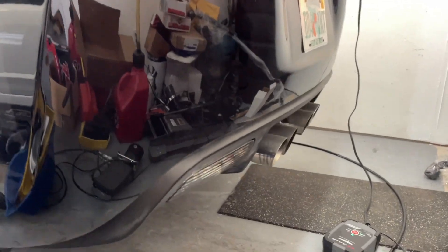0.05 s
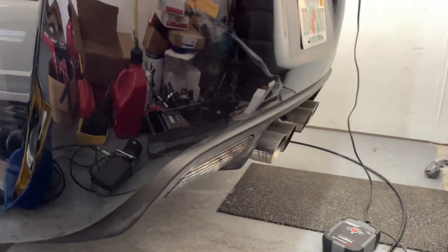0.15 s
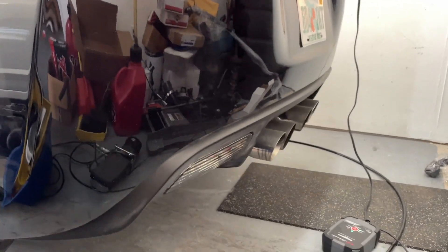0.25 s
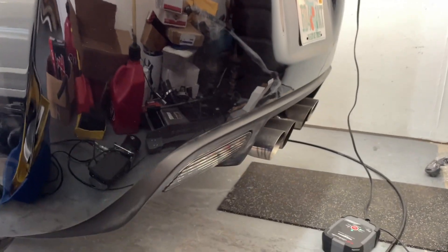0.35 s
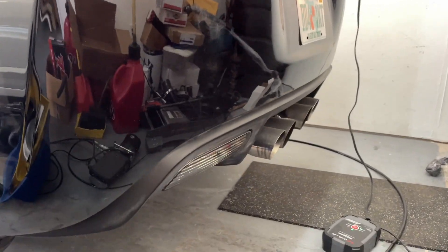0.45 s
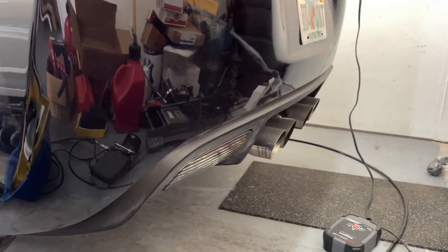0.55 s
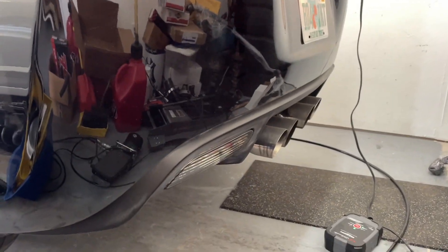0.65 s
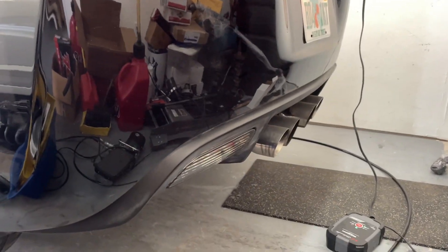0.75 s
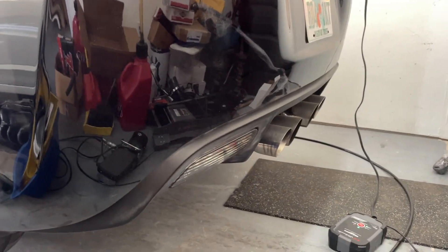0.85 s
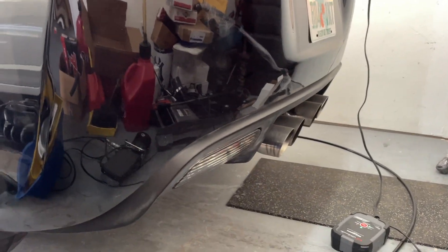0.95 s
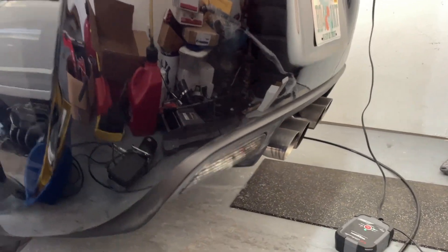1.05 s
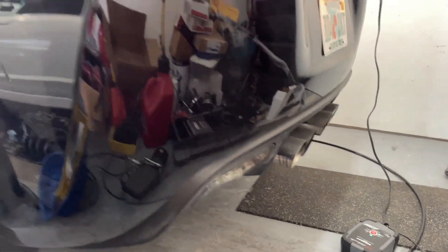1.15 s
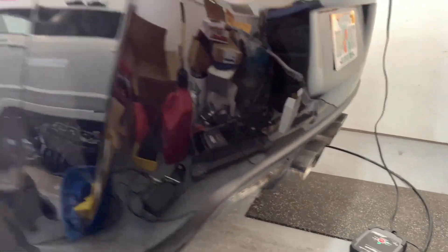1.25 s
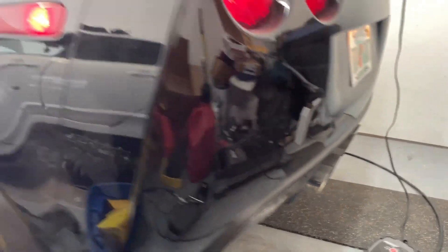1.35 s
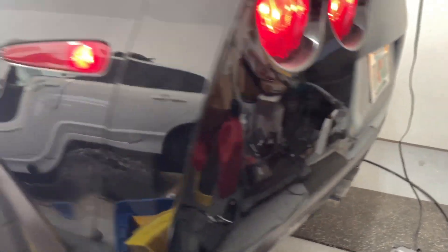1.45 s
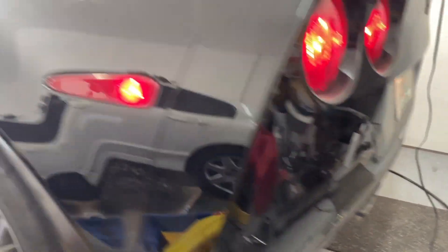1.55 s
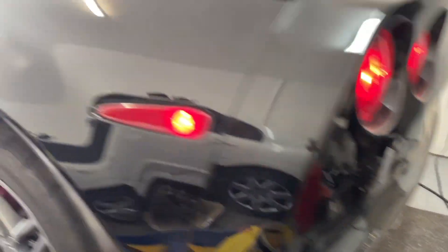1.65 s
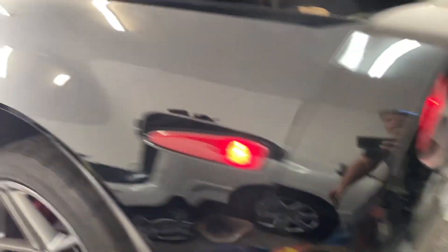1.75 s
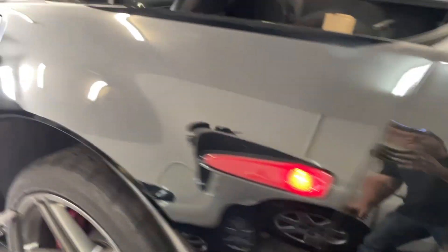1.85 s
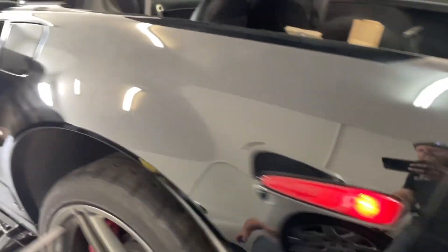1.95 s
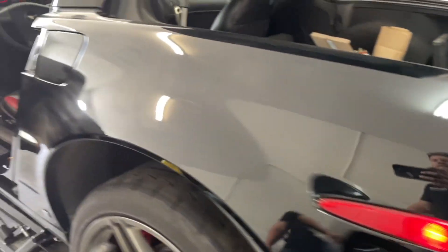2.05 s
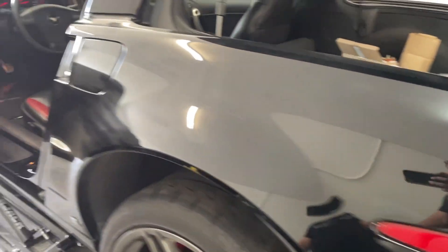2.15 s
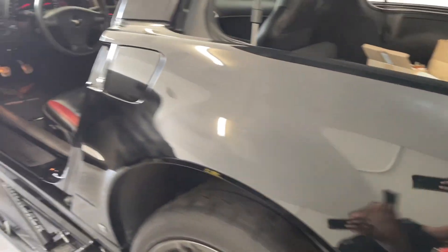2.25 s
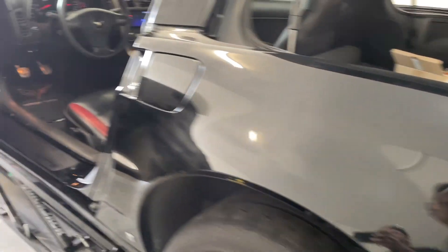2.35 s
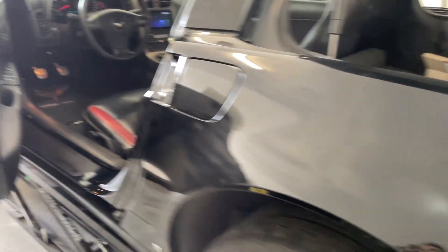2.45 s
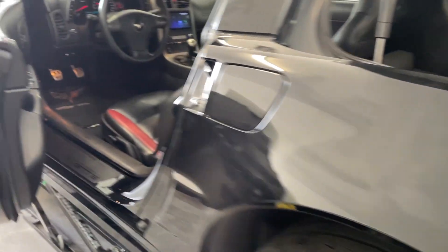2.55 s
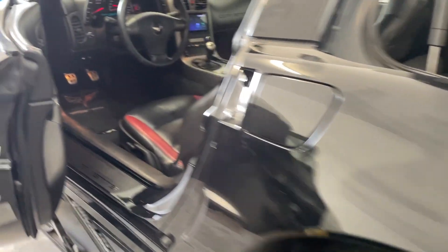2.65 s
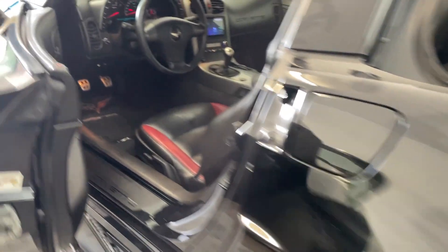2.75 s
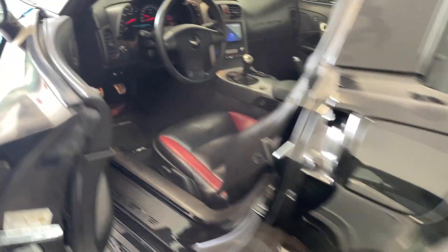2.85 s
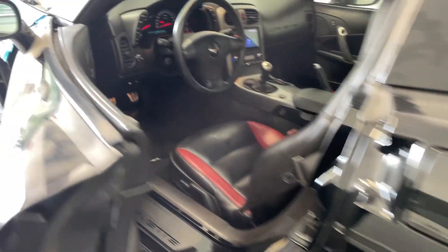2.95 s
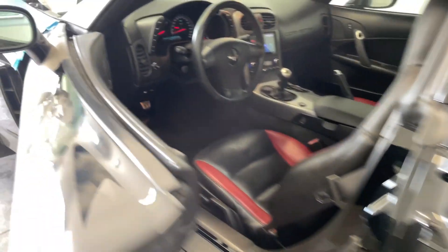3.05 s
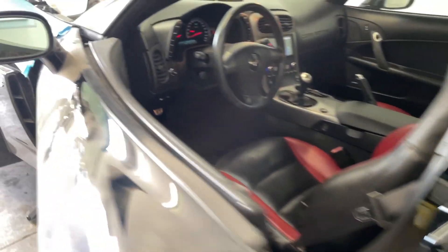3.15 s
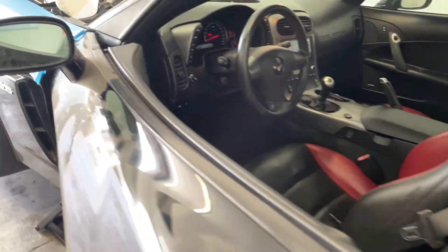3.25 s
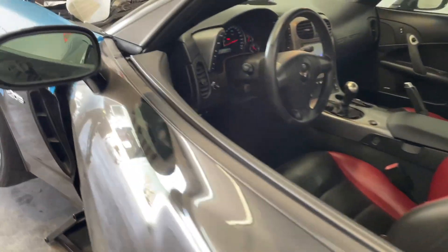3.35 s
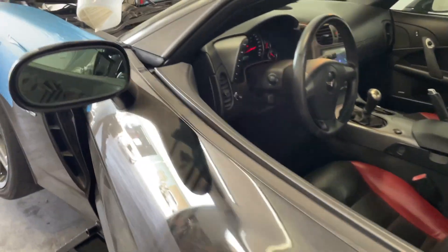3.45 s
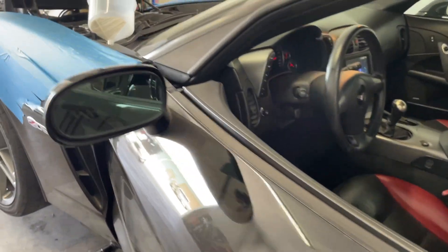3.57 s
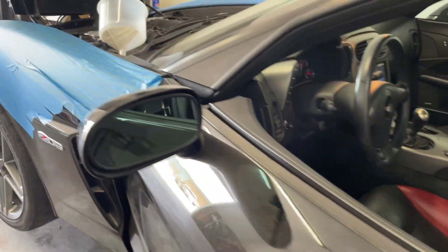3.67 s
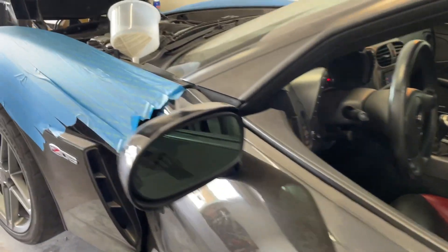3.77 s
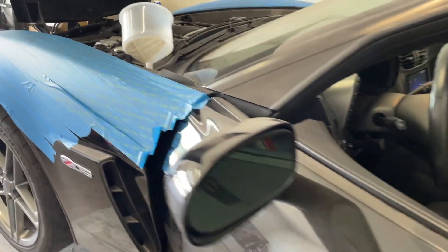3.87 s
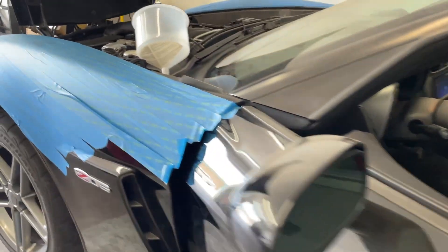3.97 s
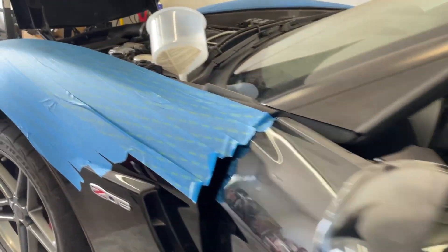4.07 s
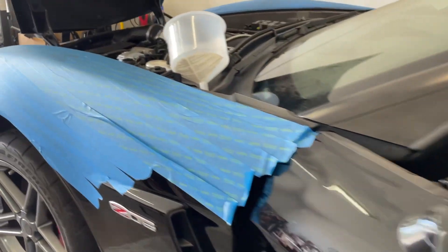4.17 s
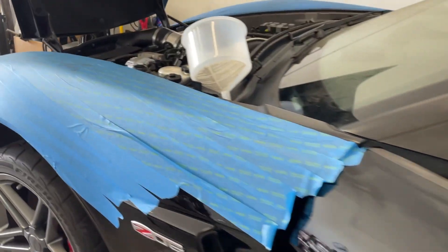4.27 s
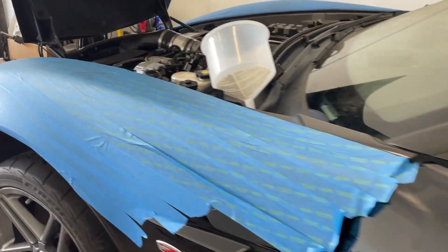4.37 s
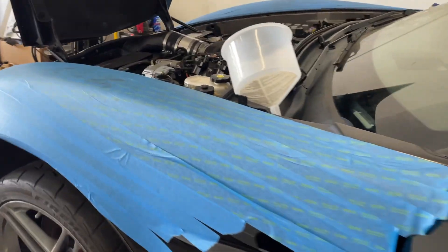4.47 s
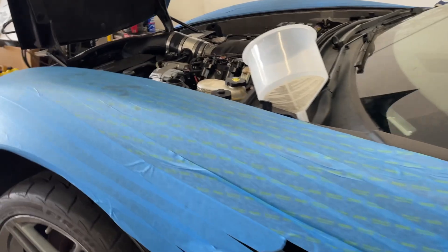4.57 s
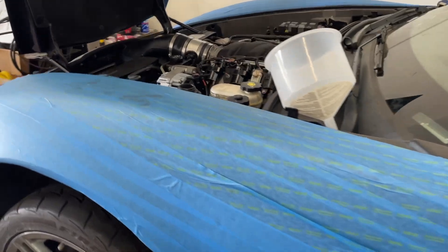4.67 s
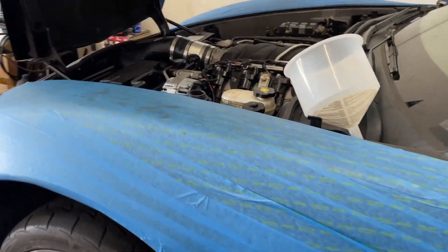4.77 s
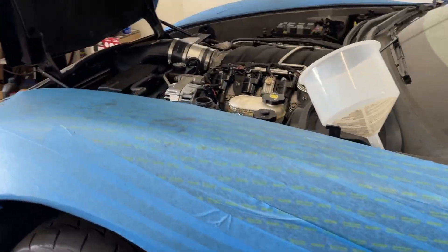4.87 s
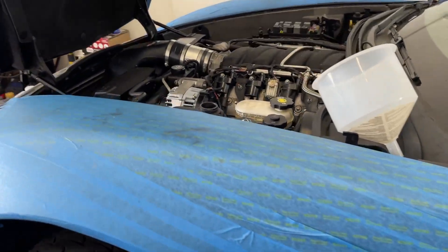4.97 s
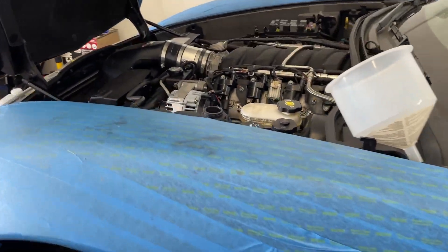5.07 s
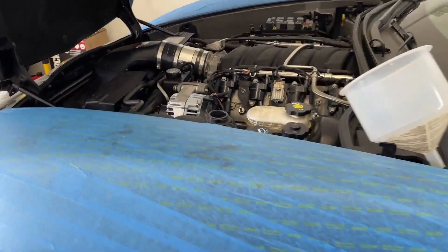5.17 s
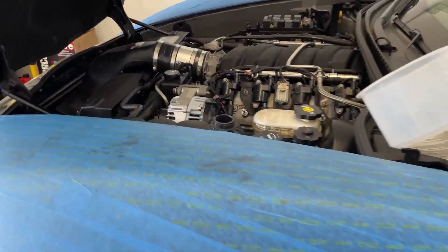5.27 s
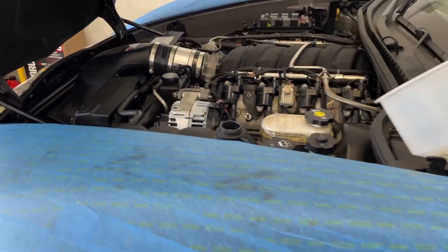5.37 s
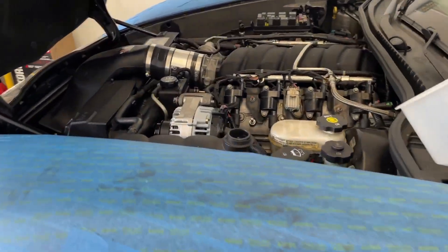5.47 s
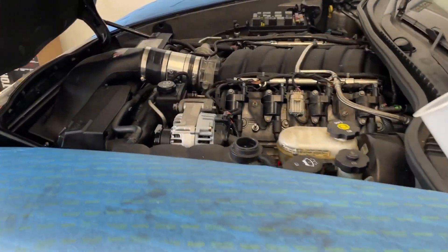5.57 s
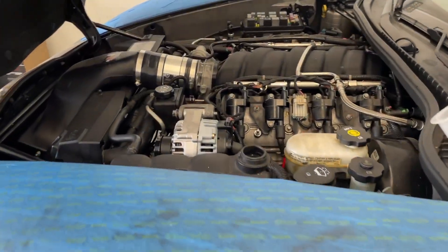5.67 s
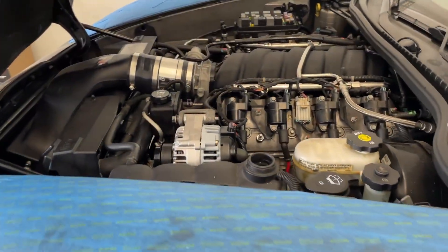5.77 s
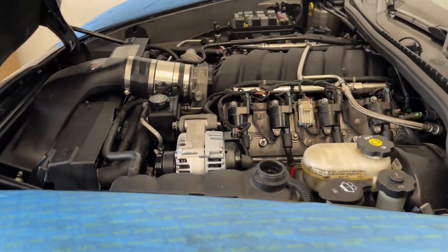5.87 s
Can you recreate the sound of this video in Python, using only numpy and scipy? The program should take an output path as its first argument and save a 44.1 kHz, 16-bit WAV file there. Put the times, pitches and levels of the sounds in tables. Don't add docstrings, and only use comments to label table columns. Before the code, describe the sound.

Close behind a car's tailpipes in a hard garage, a large V8 idles roughly: rapid low thumps with torn, spitting rasps of gas in uneven bunches. The handheld stereo microphone walks past the open door, where the rasp fades and a boxy low resonance appears, then reaches the open engine bay with softer throbbing, steady hiss, valve clatter and small belt chirps.

```python
import sys
import numpy as np
from scipy import signal
from scipy.fft import rfft, irfft
from scipy.io import wavfile
from scipy.ndimage import uniform_filter1d

SR = 44100
rng = np.random.default_rng(int(sys.argv[2]) if len(sys.argv) > 2 else 0)


def store_pcm(level_fs):
    pcm = np.round(np.clip(level_fs, -1, 1) * 32767).astype(np.int16)
    wavfile.write(sys.argv[1], SR, np.atleast_2d(pcm).T)


def rack_gain(trim_db):
    fader = np.asarray(trim_db, float)
    return 10 ** (fader / 20)


N = 261072

PLACES_S = [1.84, 3.7, 4.92]

# (time [s], thump [dB], rasp [dB])
BEAT_1 = [(0.165, -2.5, -25), (0.41, -3.5, -29), (0.6468, -4, -23), (0.886, -4.5, -22), (1.126, -5, -21.5),
          (1.358, -5, -20), (1.599, -5, -22), (1.842, -5, -23), (2.088, -5, -24.5), (2.3258, -5.5, -24.5),
          (2.5625, -6.5, -23.5), (2.804, -8.5, -24.5), (3.0456, -10.5, -25), (3.2858, -6, -29.5),
          (3.525, -11.5, -32.5), (3.763, -15, -41), (4, -13, -34), (4.238, -7.5, -33), (4.474, -9.5, -43),
          (4.706, -10, -49), (4.9444, -6, -43), (5.188, -7.5, -36), (5.424, -10, -46), (5.658, -17, -53),
          (5.8928, -6, -32)]
# (time [s], thump [dB], rasp [dB])
BEAT_2 = [(0.192, -10, -46), (0.4503, -14, -33), (0.692, -6.5, -21.5), (0.933, -4, -23),
          (1.1693, -4.5, -21), (1.404, -6.5, -22), (1.647, -4, -23), (2.134, -9, -26), (2.375, -5.5, -26),
          (2.608, -12, -26), (2.85, -8, -25), (3.089, -7, -28), (3.331, -10, -27), (3.571, -9.5, -34),
          (3.7957, -8, -31), (4.0327, -8, -33), (4.535, -8, -38), (4.7365, -16, -28.5), (5.459, -20, -34),
          (5.708, -8.5, -41)]
# (time [s], thump [dB], rasp [dB])
BEAT_3 = [(.0032, -4.5, -24.5), (0.243, -3, -24), (0.483, -4.5, -21), (0.722, -4, -22),
          (0.9624, -3.5, -23.5), (1.199, -9.5, -24), (1.676, -3.5, -27.5), (1.9186, -5, -24.5),
          (2.1639, -8, -27), (2.4033, -3, -25.5), (3.108, -19, -40), (3.352, -15, -37), (3.828, -8, -41),
          (4.076, -11, -33), (4.311, -10.5, -49), (4.565, -15, -31), (4.785, -6, -24), (5.026, -7, -29),
          (5.266, -7, -27), (5.5013, -6, -26), (5.7358, -2, -26.5)]
# (time [s], thump [dB], rasp [dB])
BEAT_4 = [(.044, -10.5, -34), (0.287, -5.5, -25.5), (0.5274, -3, -23), (0.7658, -6, -24.5),
          (1.0033, -13, -45), (1.24, -9, -50), (1.476, -8.5, -30.5), (1.717, -13, -34), (2.444, -16, -32),
          (2.68, -11.5, -31.5), (2.908, -20, -38), (3.147, -11, -36), (3.3904, -14, -35.5),
          (3.629, -14.5, -36.5), (3.8618, -18, -34), (4.121, -10, -27.5), (4.355, -15, -29.5),
          (4.589, -5, -27), (4.8266, -5, -28), (5.07, -11, -27.5), (5.3078, -9.5, -32), (5.5419, -4, -28),
          (5.7765, -3, -27.5)]
# (time [s], thump [dB], rasp [dB])
BEAT_5 = [(.077, -4.5, -20.5), (0.334, -4.5, -19.5), (0.573, -5.5, -25.5), (.81, -14, -33),
          (1.267, -15, -32), (1.5087, -7, -27), (1.7668, -9, -26.5), (2.011, -6.5, -25), (2.4898, -10, -29),
          (2.9557, -11, -33.5), (3.199, -9, -49), (3.437, -13, -48), (3.675, -7, -39), (3.913, -8, -37),
          (4.1513, -7, -29.5), (4.389, -5, -28), (4.623, -13, -27), (4.859, -17, -29.5),
          (5.1039, -8.5, -30.5), (5.3417, -6, -29), (5.5725, -26, -32)]
# (time [s], thump [dB], rasp [dB])
BEAT_6 = [(0.122, -5.5, -25), (0.382, -9, -29), (.842, -6.5, -27), (1.0813, -3.5, -23), (1.3141, -2.5, -21),
          (1.555, -4, -24.5), (1.8, -9.5, -25), (2.044, -10, -32.5), (2.2825, -8, -30), (2.5193, -6, -25.5),
          (2.759, -4, -26.5), (2.9979, -6.5, -24.5), (3.243, -9, -26), (3.4807, -9, -33),
          (3.7188, -15, -28), (3.955, -7.5, -27.5), (4.1924, -7.5, -29), (4.433, -10, -25.5),
          (4.6667, -14, -33), (4.9029, -9, -32), (5.1463, -6, -29.5), (5.3825, -6.5, -34),
          (5.628, -17, -52), (5.8538, -6.5, -36)]
# (time [s], thump [dB], rasp [dB])
TWINS = [(.32, -14, -24.5), (0.561, -27, -23), (.918, -19, -22), (1.044, -18, -33), (1.157, -16, -23.5),
         (1.39, -27, -42), (1.753, -12, -26.5), (1.946, -23, -40), (2.119, -25, -34), (2.356, -25, -26),
         (2.733, -16, -49), (4.282, -10.5, -47)]
# (bark [dB], steep front [dB])
CHARACTER = [(-24.5, -17.5), (-35, -32), (-29.5, -22), (-21, -17.5), (-29.5, -32.5), (-31, -22),
             (-31.5, -27.5)]
USUAL_RASP_DB = -25
BARK_PER_RASP, FRONT_PER_RASP, FRONT_GAIN_DB_PER_S = 0.99, 1, 0.26

# (frequency [Hz], density [dB per Hz])
GAS_SUM = [(700, -12.5), (1570, -8), (1800, -13), (2200, -6.5), (2400, -5), (2650, -6), (3200, -6.5),
           (6750, -11.5), (7400, -16), (8200, -31.5), (9140, -16.5), (10600, -12.5), (13400, -22.5),
           (13900, -33), (14600, -44), (15700, -46)]
# (frequency [Hz], density [dB per Hz])
BAY_SUM = [(530, -30), (900, -6.5), (1850, -5.5), (2540, -2), (3170, -4.5), (3690, -2.5), (4000, -5),
           (6990, -7.5), (8330, -24.5), (9250, -11), (10900, -8.5), (13100, -14.5), (13700, -21),
           (14600, -40)]
# (frequency [Hz], density [dB per Hz])
GAS_DIFF = [(530, -8), (900, -5), (1080, -4), (2750, -1.5), (4190, -8), (5170, -4.5), (6080, -9),
            (8330, -2), (10400, -10.5), (11400, -30), (12200, -32), (13000, -15), (15600, -14),
            (16000, -40)]
# (level [dB] at tail, door, bay)
HISS_DB = [-30.5, -26.5, -25]
CRACKLE_DB = 1
# (frequency [Hz], width [Hz], lift [dB])
TIP_RINGS = [(635, 50, 5), (1300, 49, 2), (1890, 25, 3), (2170, 22, 6), (2560, 25, 6.5), (2700, 35, 2.5),
             (2840, 20, 1), (2970, 40, 4), (3270, 25, -2), (3450, 22, 6.5), (5500, 55, 1.5)]
# (depth [dB] in tail gas, bay gas, bark)
STREAK_DB = [2.6, 2.0, 1.4]

# (delay [s], signed gain)
ECHOES = [
    [(.0086, -0.33), (.0262, -0.45), (.0367, 0.47), (.0505, -0.31), (.07, 0.089), (.088, 0.033)],
    [(.0074, 0.066), (.0257, 1), (.0341, 0.83), (.0541, -0.3), (.07, 0.11), (.088, 0.052)],
    [(.0095, .4), (.0274, -0.76), (.0379, -0.67), (.0674, 0.4), (.052, 0.018), (.088, 0.007)],
]
# (delay [s], gain)
SNAP_ECHO = [
    (0.0438, 0.31),
    (0.0468, 0.14),
    (0.054, 0.98),
]
# (frequency [Hz], t60 [s], level [dB] at tail, door, bay)
PIPE = [(117, 0.3, -13, -16, -8), (133.4, 0.28, -29, -14, -1), (157, 0.073, 6, 8.5, -12),
        (179, 0.18, -7, -28, -30)]
# (level [dB] at tail, door, bay)
PUSH_DB = [-25.5, -35, -29]
PUSH_S = 0.004

# (frequency [Hz], density [dB per Hz])
BARK = [(110, -1), (190, -3.5), (215, -6), (300, -7.5), (430, -6), (520, -7.5), (633, -4), (1050, -10.5),
        (1150, -11), (1600, -12.5), (2080, -18.5), (3520, -120)]
# (level [dB] at tail, door, bay)
CLATTER_DB = [-30.5, -31, -28]
# (lift [dB] at tail, door, bay)
BODY_DB = [0.5, 5.5, 1]
BODY_PUNCH = 0.53
PIPE_TRIP_S, PIPE_RETURN = .0441, 0.53
# (time [s], peak [dB], frequency [Hz])
KNOCKS = [(0.16, -18.5, 627), (0.214, -24, 560), (0.283, -23, 654), (0.325, -24, 575), (0.464, -21, 587),
          (0.52, -23, 673), (0.644, -18, 643), (0.884, -18, 654), (0.926, -21, 566), (0.962, -21, 633),
          (1.124, -19, 641), (1.164, -22, 657), (1.353, -19, 657), (1.591, -16.5, 584), (1.637, -18.5, 615),
          (1.796, -21.5, 623), (1.835, -18, 616), (2.087, -21, 719), (2.329, -29, 720), (2.555, -24, 692),
          (2.689, -25, 763), (2.777, -26, 613), (2.809, -22, 738), (3.051, -24, 754), (3.391, -26, 616),
          (4.117, -27, 627), (4.563, -20, 735), (5.076, -24, 692), (5.124, -24, 594), (5.278, -24, 760),
          (5.481, -28, 630), (5.51, -21, 635), (5.572, -29, 684), (5.769, -23, 660)]

# (frequency [Hz], density [dB per Hz])
RUMBLE = [(22, 2), (33, -20), (44, 5), (58, 2.5), (85, -2), (100, -2), (122, -8.5), (150, -13.5),
          (200, -21), (260, -22)]
# (level [dB] at tail, door, bay)
RUMBLE_DB = [-1, -2.5, -2]

# (time [s], peak [dB])
SPITS = [(0.23, -15.5), (0.48, -14), (0.7113, -14), (1.0725, -18.5), (1.1149, -14), (1.351, -12.5),
         (1.547, -12), (1.6372, -18), (1.7878, -17), (2.3191, -21), (2.7487, -23), (2.1, -26), (2.805, -29),
         (2.512, -24), (1.7, -20), (3.2296, -32), (0.5, -19), (.95, -16), (1.589, -18), (.064, -30),
         (0.31, -20), (.875, -28), (2.078, -21), (2.356, -25), (4.3328, -31), (3.714, -31), (3.9596, -26),
         (4.2086, -27), (4.5603, -26), (5.2367, -22), (5.7077, -23.5), (2.99, -24), (3.468, -25)]
# (time [s], peak [dB])
TIPS = [(.0643, -13), (.2299, -13.5), (.2828, -17), (0.308, -14), (0.473, -7.5), (0.5204, -9.5),
        (0.6804, -23), (0.711, -10), (0.92, -12), (0.95, -13), (1.069, -14), (1.119, -13), (1.155, -8.5),
        (1.3014, -34), (1.3497, -16), (1.9056, -23), (2.1274, -25)]
TIP_HZ, TIP_SCATTER_HZ = 2645, 30
# (time [s], peak [dB], frequency [Hz])
TIPS_HIGH = [(0.0648, -20, 3300), (0.3225, -16, 3270), (0.4783, -16, 2990), (0.68, -15, 2940),
             (0.8769, -15, 2920), (1.0675, -20, 3490), (1.1423, -17, 3270), (1.303, -24, 3060),
             (1.3463, -25, 3000), (1.5439, -11, 3075), (1.5888, -28, 3100), (2.3221, -22, 3460),
             (2.083, -17, 5760), (2.356, -20, 5650), (2.006, -24, 5570), (2.158, -22, 5550),
             (.0795, -13, 2410), (.111, -18, 2170), (.233, -22, 2210), (.566, -14.5, 2270),
             (1.491, -20, 2870), (1.7858, -17, 2230), (1.19, -15.5, 2700), (1.305, -21, 2500),
             (1.398, -17, 3450), (1.39, -18, 2490), (1.755, -19, 2350), (2.13, -22, 2540),
             (2.33, -19, 1510), (2.345, -21.5, 2590), (2.39, -25, 2500), (2.512, -25, 2800),
             (2.747, -27, 2600), (.548, -19, 2240), (.553, -20, 3500), (.875, -19.5, 2270),
             (.925, -15, 3470), (3.233, -27, 3170), (3.473, -24, 3110), (1.118, -21, 893),
             (1.352, -14.5, 1176), (.472, -16.5, 1160), (1.602, -17, 898)]
# (time [s], peak [dB])
FIZZ = [(.24, -49), (.5, -49), (1.112, -42), (1.584, -44), (1.65, -52), (2.744, -43), (2.99, -52),
        (3.47, -50), (4.19, -52), (4.53, -52), (4.88, -53), (4.98, -53)]

# (time
# [s], peak [dB], frequency [Hz])
CHIRPS_AND_TICKS = [(4.797, -13.5, 3660), (4.8529, -33, 3700), (5.3909, -12, 3730), (5.4244, -25, 3730),
                    (5.451, -32, 3726), (5.5089, -16.5, 3680), (5.519, -22, 3630), (5.5594, -22, 3570),
                    (5.6266, -25, 3730), (5.548, -27, 3720), (5.7451, -16, 3700),
                    (1.9, -19, 3720), (2.6, -21, 3740), (3.1, -26, 3640), (2.6007, -23, 3500), (3.6194, -22.5, 3740),
         (4.333, -19, 1180), (2.556, -19, 1150), (2.084, -20, 1610)]
CHIRP_SAG_HZ_PER_S = -3000
# (time [s], frequency [Hz], level [dB])
DRONE = [(2.75, 153.5, -27), (2.85, 152.8, -29), (2.93, 154, -38), (3.02, 155.4, -25), (3.15, 157, -34),
         (3.26, 157, -23.5), (3.38, 157, -25), (3.43, 158.6, -32), (3.5, 160, -27), (3.92, 158.7, -26.5),
         (4.03, 161, -37), (4.15, 161, -28.5), (4.3, 162, -36), (4.5, 158.3, -29), (4.85, 159, -29),
         (5.0, 160, -34), (5.15, 159.2, -29), (5.4, 158.4, -32.5)]
# (frequency [Hz], level [dB], heard from [s], to [s])
HUM = [
    (282, -37.5, 4.4, 5.05),
    (332, -41, 4.45, 4.9),
    (335, -42, 5.15, 5.5),
]

# (lean [dB] at tail, door, bay)
LEAN_DB = [2.4, 3.6, 2.8]
# (lift [dB] at tail, door, bay)
WIDE_TOP_DB = [-3, 2, 3]
ASKEW = [
    [.05, .15, .09],
    [.1, .15, .12],
    [-.05, -.22, -.18],
    [.35, .35, .35],
]


def evened(x):
    return x / np.sqrt(np.mean(x ** 2) + 1e-20)


def along(s, value):
    return np.interp(np.arange(N) / SR, s, value)


def place(k):
    return along(PLACES_S, np.eye(3)[k])


def firings():
    beats = [BEAT_1, BEAT_2, BEAT_3, BEAT_4, BEAT_5, BEAT_6, TWINS]
    rows = []
    for beat, (bark_db, front_db) in zip(beats, CHARACTER):
        for s, thump_db, rasp_db in beat:
            harder = rasp_db - USUAL_RASP_DB
            front = front_db + FRONT_PER_RASP * harder + FRONT_GAIN_DB_PER_S * s
            rows.append((s, thump_db, rasp_db, bark_db + BARK_PER_RASP * harder, front))
    return np.array(rows)


def train(size, lead_s=0.):
    out = np.zeros(N)
    at = np.round((firings()[:, 0] - lead_s) * SR).astype(int)
    np.add.at(out, np.clip(at, 0, N - 1), size)
    return out


def noise(points, patchy_db):
    a, b, patches = rng.standard_normal((N // 128 + 5, 257, 3)).T
    patches = uniform_filter1d(patches, size=4, axis=0)
    patches = evened(uniform_filter1d(patches, size=8, axis=1))
    white = signal.istft((a + 1j * b) * rack_gain(patchy_db * patches), nperseg=512, noverlap=384)[1][:N]
    f, db = np.transpose(points)
    hz = np.fft.rfftfreq(N, 1 / SR)
    colour_db = np.interp(np.log(hz + 1), np.log(f + 1), db, -90, -90)
    return evened(irfft(rfft(white) * rack_gain(colour_db), N))


def gusts(db, lead_s, rise_s, fall_s, hall_db, hall_s):
    t = np.arange(SR // 2) / SR
    fall = np.exp(-t / fall_s) + rack_gain(2 * hall_db) * np.exp(-t / hall_s)
    shape = (1 - np.exp(-t / rise_s)) * fall
    power = signal.oaconvolve(train(rack_gain(2 * db), lead_s), shape / shape.max())[:N]
    return np.maximum(power, 0)


def swing(t, hz, width_s):
    return np.exp(2j * np.pi * hz * t - .5 * (t / width_s) ** 2)


def pips(rows, length_s, rough, under_db, glide=0.):
    out, t = np.zeros(N + SR), np.arange(3000) / SR
    shape = (t / length_s * np.exp(1 - t / length_s)) ** 0.92
    for s, db, hz in rows:
        waver = rough * np.cumsum(rng.standard_normal(len(t)))
        phase = 2 * np.pi * (hz + glide * (t / 2 - length_s)) * t + waver
        start = round((s - length_s / 2) * SR)
        out[start:][:len(t)] += rack_gain(db - under_db) * shape * np.sin(phase)
    return out[:N]


def treble(x, hz):
    return signal.sosfiltfilt(signal.butter(2, hz, "high", fs=SR, output="sos"), x)


def streaked(x, streak_db, rings=()):
    hz, _, z = signal.stft(x, SR, nperseg=2048, noverlap=1536)
    drift = uniform_filter1d(rng.standard_normal(z.shape[::-1]), size=18, axis=0)
    lift_db = streak_db * evened(drift).T
    for ring_hz, width_hz, db in rings:
        lift_db = lift_db + (db / (1 + (2 * (hz - ring_hz) / width_hz) ** 2))[:, None]
    return evened(signal.istft(z * rack_gain(lift_db), SR, nperseg=2048, noverlap=1536)[1][:N])


def piped(x):
    taps, trips = np.zeros(SR // 4), np.arange(5)
    taps[np.round(trips * PIPE_TRIP_S * SR).astype(int)] = PIPE_RETURN ** trips
    return signal.oaconvolve(x, taps / np.linalg.norm(taps))[:N]


def rasp():
    burst = gusts(firings()[:, 2] - 1.5, lead_s=.015, rise_s=0.01, fall_s=0.021, hall_db=-11, hall_s=0.026)
    flicker = evened(uniform_filter1d(rng.standard_normal(N), size=90))
    burst = burst * rack_gain(2 * CRACKLE_DB * flicker + 0.5)
    spits = spit_power()
    steady = rack_gain(2 * (along(PLACES_S, HISS_DB) - 4.0))
    level = np.sqrt(burst + rack_gain(-16.0) * spits + steady)
    bright = np.sqrt(burst + spits + rack_gain(-8.0) * steady)
    near_bay = along([1.6, 3.6], [0, np.pi / 2])
    tail_gas = streaked(noise(GAS_SUM, patchy_db=1.8), STREAK_DB[0], TIP_RINGS)
    bay_gas = streaked(noise(BAY_SUM, patchy_db=1.74), STREAK_DB[1])
    total = np.cos(near_bay) * tail_gas + np.sin(near_bay) * bay_gas
    pair = np.array([total, rack_gain(-1.5) * noise(GAS_DIFF, patchy_db=1.5)])
    top = treble(pair, 4400)
    return level * (pair - top) + bright * top + np.outer([1, .25], tip_whistles())


def thumps(hz=74.2, width_s=0.0073, late_s=0.0058, snap_hz=134.0, snap_s=0.0064):
    size, snap = rack_gain(firings()[:, 1]), rack_gain(firings()[:, 4])
    early = 1500
    t = (np.arange(8000) - early) / SR
    out = np.zeros(N)
    for k, (echoes, back) in enumerate(zip(ECHOES, SNAP_ECHO)):
        paths = [(0.00027, 0.98)] + echoes
        heard = sum(-gain * swing(t - late_s - delay, hz, width_s).real for delay, gain in paths)
        front = sum(gain * swing(t + 0.00053 - delay, snap_hz, snap_s).imag for delay, gain in [(0, 1), back])
        out += signal.oaconvolve(train(size) * place(k), heard)[early:early + N]
        out += signal.oaconvolve(train(snap) * place(k), front)[early:early + N]
    t = np.arange(SR // 3) / SR
    for mode_hz, t60, *db in PIPE:
        ring = rack_gain(-60 * t / t60) * np.sin(2 * np.pi * mode_hz * t) * (1 - np.exp(-t / 0.0091))
        out += rack_gain(along(PLACES_S, db)) * signal.oaconvolve(train(snap, 0.0017), ring)[:N]
    return out


def push():
    t = (np.arange(3001) - 1500) / SR / PUSH_S
    shove = -t * np.exp(-.5 * t ** 2)
    return rack_gain(along(PLACES_S, PUSH_DB) + 5) * signal.oaconvolve(train(rack_gain(firings()[:, 1])), shove, "same")


def bark():
    burst = gusts(firings()[:, 3] - 4.0, lead_s=0.008, rise_s=0.0094, fall_s=0.012, hall_db=-16, hall_s=0.02)
    level = np.sqrt(burst + rack_gain(2 * (along(PLACES_S, CLATTER_DB) - 2.0)))
    dull = level * streaked(noise(BARK, patchy_db=0.93), STREAK_DB[2])
    top = treble(dull, 325)
    body = (dull - top) * (level / level.mean()) ** (BODY_PUNCH - 1)
    top = top + pips(KNOCKS, 0.00584, rough=0.039, under_db=5.5)
    total = top + rack_gain(along(PLACES_S, BODY_DB)) * piped(body)
    return total, rack_gain(-5.5) * level * noise(BARK, patchy_db=3.5)


def rumble():
    burst = gusts(firings()[:, 1] - 21, lead_s=.001, rise_s=0.0057, fall_s=.04, hall_db=8.0, hall_s=0.25)
    level = np.sqrt(burst)
    total = rack_gain(along(PLACES_S, RUMBLE_DB)) * piped(level * noise(RUMBLE, patchy_db=2.0))
    return total, rack_gain(-8.5) * level * noise(RUMBLE, patchy_db=6.0)


def spit_power():
    t, power = np.arange(1500) / SR, np.zeros(N + 1500)
    shape = (1 - np.exp(-t / 0.0015)) ** 2 * np.exp(-t / 0.0045)
    for s, db in SPITS:
        power[round(s * SR):][:len(t)] += rack_gain(2 * db + 3.5) * shape
    return power[:N]


def tip_whistles():
    rows = [(s, db, TIP_HZ + TIP_SCATTER_HZ * rng.standard_normal()) for s, db in TIPS]
    main = pips(rows, 0.0058, rough=0.03, under_db=8.0)
    return main + pips(TIPS_HIGH, 0.006, rough=0.13, under_db=6.0)


def fizz():
    t, level = np.arange(1200) / SR, np.zeros(N + 1200)
    for s, db in FIZZ:
        level[round(s * SR):][:len(t)] += rack_gain(db + 3.0) * t / .005 * np.exp(1 - t / .005)
    return level[:N] * noise([(13300, -8), (14100, 2), (14800, 0), (15800, -1)], patchy_db=2.0)


def belt_chirps():
    return pips(CHIRPS_AND_TICKS, 0.0045, rough=.04, under_db=6.5, glide=CHIRP_SAG_HZ_PER_S)


def door_drone():
    s, hz, db = np.transpose(DRONE)
    drone = rack_gain(along(s, db)) * np.sin(2 * np.pi * np.cumsum(along(s, hz)) / SR)
    return drone * along([2.55, 2.8, 5.5, 5.7], [0, 1, 1, 0])


def accessory_hum():
    t, out = np.arange(N) / SR, np.zeros(N)
    waver = np.sin(2 * np.pi * 0.914 * t)
    for hz, db, on, off in HUM:
        level = rack_gain(db) * along([on - .1, on, off, off + 0.091], [.15, 0.96, 0.98, .15])
        out += level * np.sin(2 * np.pi * hz * t + waver)
    return out * along([3.9, 4.3], [0, 1])


def scene():
    lean = np.tanh(along(PLACES_S, LEAN_DB) * np.log(10) / 40)
    gas, gas_diff = rasp()
    dull, dull_diff = bark()
    low, low_diff = rumble()
    deep = thumps() + push() + low + dull
    front = belt_chirps() + accessory_hum() + door_drone()
    total = deep + gas + front + fizz()
    below = gas - treble(gas, 8500)
    high = treble(total, 2000)
    bass = total - high
    bands = [bass, treble(bass, 110), high - treble(high, 5500), treble(below, 6200)]
    mixed = sum(along(PLACES_S, share) * band for share, band in zip(ASKEW, bands))
    askew = signal.hilbert(mixed).imag
    diff = lean * (deep + front + 0.45 * treble(dull, 350))
    diff = diff + rack_gain(along(PLACES_S, [-17, -18, -19])) * below + askew
    diff = diff + gas_diff + treble(dull_diff, 210) + rack_gain(-6.0) * treble(low_diff, 45.0)
    diff = diff + (rack_gain(along(PLACES_S, WIDE_TOP_DB)) - 1) * treble(gas_diff, 12000)
    return np.array([total + diff, total - diff])


def roll_off(x):
    return signal.sosfilt(signal.butter(12, 15800, fs=SR, output="sos"), x)


def record(dry):
    limit = 1.05
    mix = limit * np.tanh(treble(dry, 33.0) / limit)
    return roll_off(mix)


dry = scene()
out = record(dry)
store_pcm(out)
```